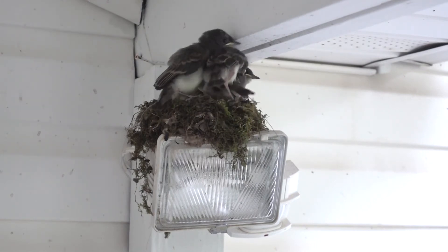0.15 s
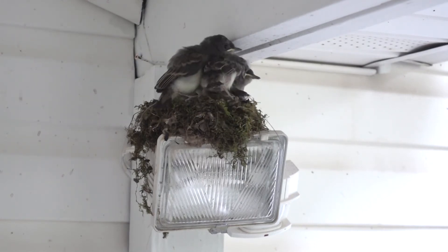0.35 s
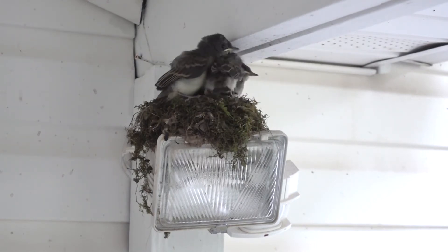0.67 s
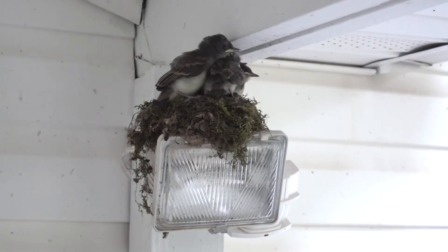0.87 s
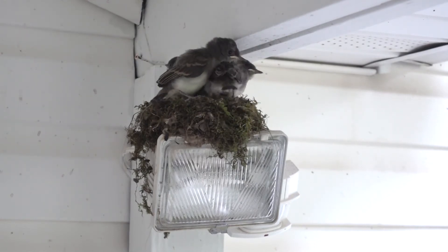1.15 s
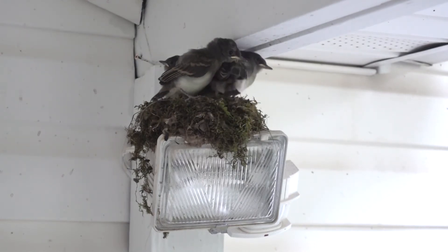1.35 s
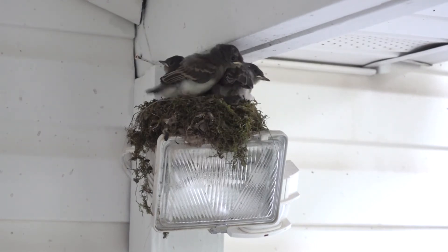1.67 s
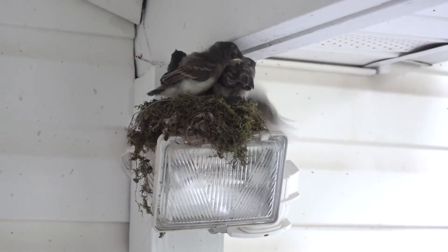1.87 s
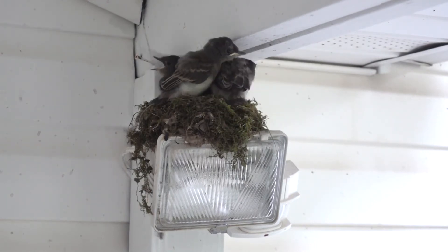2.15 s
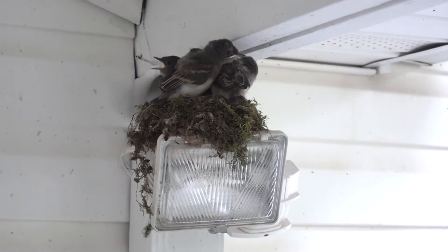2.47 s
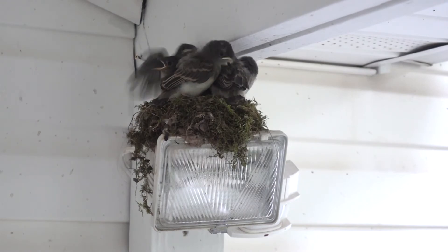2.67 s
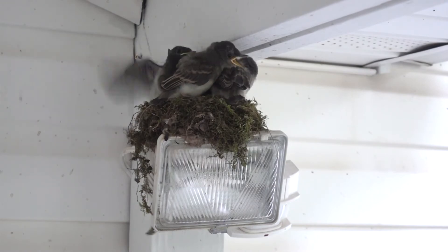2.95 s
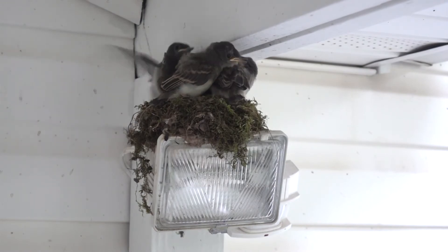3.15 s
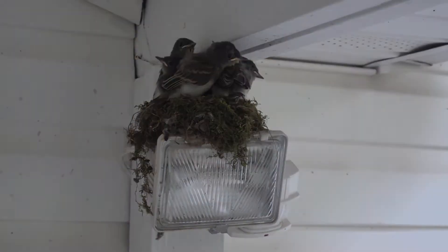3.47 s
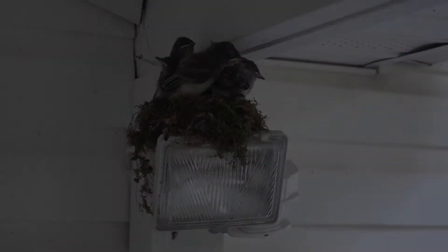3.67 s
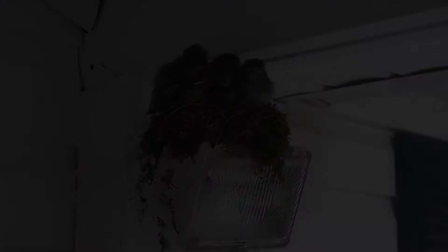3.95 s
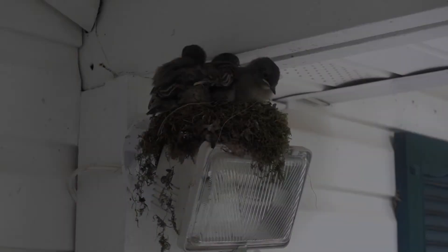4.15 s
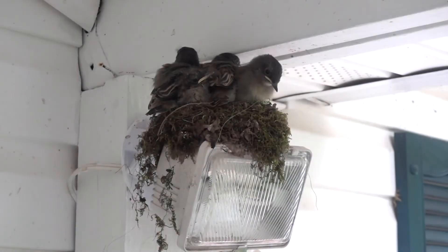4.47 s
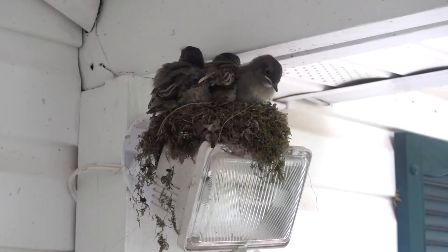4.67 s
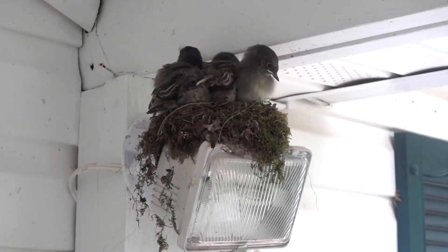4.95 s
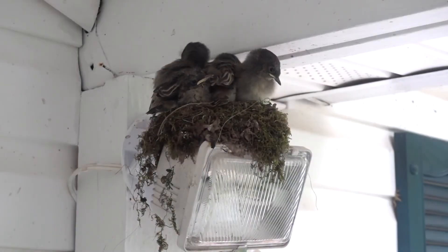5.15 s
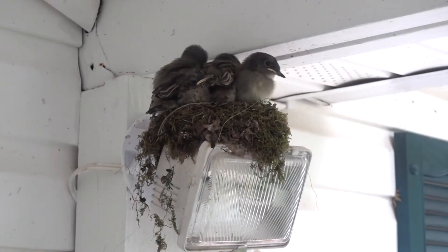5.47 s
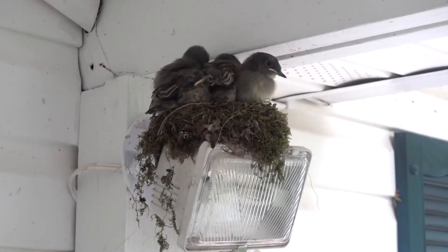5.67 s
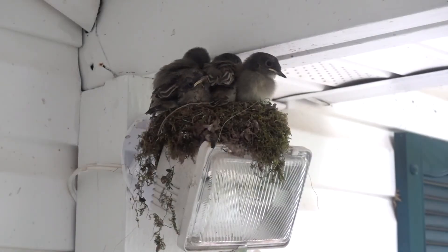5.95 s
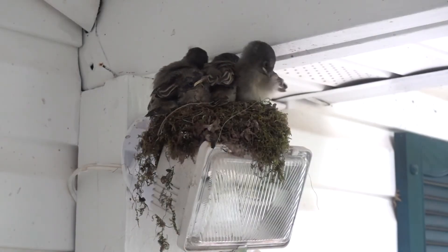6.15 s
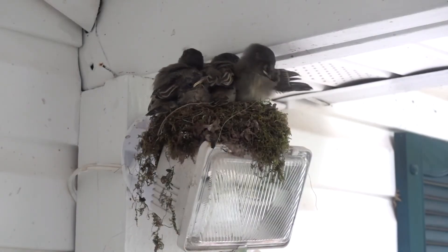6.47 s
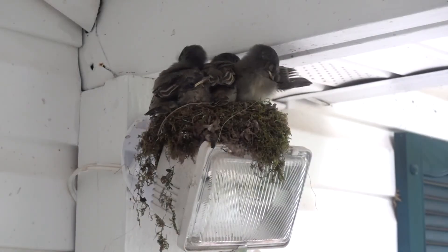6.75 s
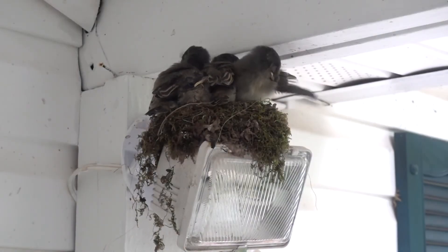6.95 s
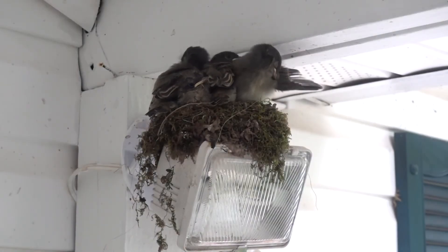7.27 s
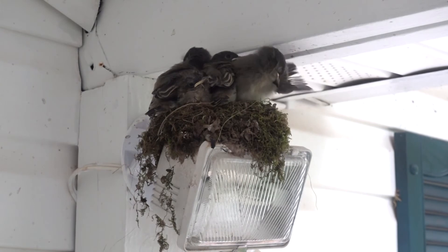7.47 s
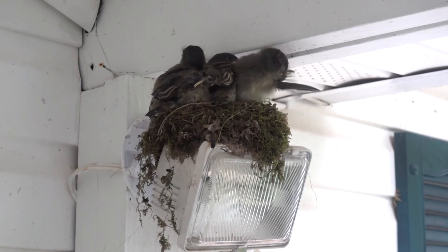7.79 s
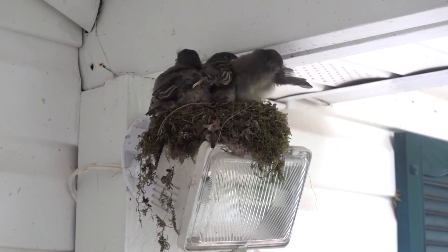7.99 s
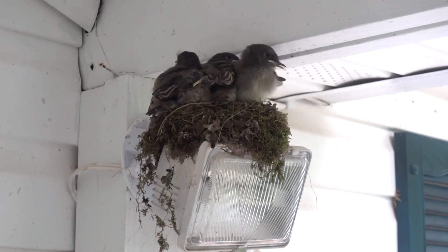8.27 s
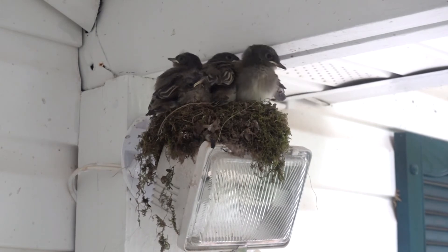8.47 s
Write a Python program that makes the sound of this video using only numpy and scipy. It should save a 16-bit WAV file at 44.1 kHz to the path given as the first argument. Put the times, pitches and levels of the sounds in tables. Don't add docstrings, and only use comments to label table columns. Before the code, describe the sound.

Outdoor porch, nearby stereo microphone, soft air hiss and faint machine hum. From 0 to 1.6 s a few chicks give thin, high whistles of about a tenth of a second, mostly sliding downward, at the start, 0.4, 0.9 and 1.4 s. At 1.9 s a loud steep cry begins a commotion: wing slaps and low air thumps around 2.0, 2.2-2.3 and 2.8 s, feathers rustling until about 3.1 s, with crowded piercing cries and grainy rasps through 3.7 s. At 3.9 s the background switches to darker air, deep rumble and a distant engine drone that slowly sinks and grows. Clear single peeps follow at 4.3, 4.8 and 5.7 s, fainter ones between and at 6.2, 6.9 and 7.5 s, then wavering calls around 8 s and short ones to 8.55 s. A tiny far insect buzz comes and goes. Calls have a short porch echo.

```python
import sys
import numpy as np
from scipy import signal
from scipy.fft import rfft, irfft, next_fast_len
from scipy.io import wavfile
from scipy.ndimage import uniform_filter1d, map_coordinates

SR = 44100
rng = np.random.default_rng(int(sys.argv[2]) if len(sys.argv) > 2 else 0)


def elevation(decibels):
    levels = np.asarray(decibels, float)
    return 10 ** (levels / 20)


def unload_wav(signal):
    wavfile.write(
        sys.argv[1],
        SR,
        np.round(np.clip(np.atleast_2d(signal).T, -1, 1) * 32767).astype(np.int16),
    )


N = 380141
TIME_S = np.arange(N) / SR
SCENE_CHANGE_S = 3.913

# hz, density_db_per_hz
AIR_BEFORE = [(30, -28.5), (50, -1), (92, -5.5), (170, -2), (400, -7), (480, -10), (700, -13),
              (1000, -19.5), (1450, -20.5), (1700, -22.5), (1950, -14.5), (3040, -21.5), (7000, -24.5),
              (15800, -28)]
# hz, density_db_per_hz
AIR_AFTER = [(100, -14.5), (160, -20.5), (225, -12.5), (300, -20), (480, -23.5), (800, -29), (1400, -30),
             (1620, -33.5), (1900, -26.5), (2800, -29), (4000, -34), (7000, -36), (11000, -40),
             (15800, -40.5)]
# hz, density_db_per_hz
RUMBLE = [(20, -25.0), (50, -4), (100, -2.5), (130, -9.0), (170, -64)]
AIR_BEFORE_DB, AIR_AFTER_DB, RUMBLE_DB = -50.5, -50, -83
# hz, correlation
LIKENESS = [(60, 1), (150, 0.98), (290, 0.89), (640, 0.2), (1410, 0.2), (3100, 0)]

# time_s, firing_hz, level_db
DRONE = [
    (3.911, 124.9, -42),
    (4.3, 122.8, -40.5),
    (5.4, 120.9, -38.5),
    (5.8, 121.4, -37),
    (7.5, 117, -35.5),
    (8.3, 115, -34.5),
    (8.62, 113.2, -34.5),
]
# hz, before_db, after_db, width_hz
HUM = [
    (27, -57.5, -57, 1.3),
    (63.2, -82, -57, 0.55),
    (101, -69.5, -54, 5.2),
    (126.5, -60, -60, 5),
    (235.3, -60.5, -63, 6.2),
    (411.5, -67, -69.5, 10),
]
# start_s, length_s, level_db
INSECT = [
    (4.59, 0.19, -59),
    (5.005, 0.13, -62),
    (6.41, 0.13, -61.5),
    (8.129, 0.24, -62.5),
    (8.403, .18, -59),
]

# hz, t60_s
PORCH_DECAY = [(300, .2), (5000, .235), (8500, .17), (11500, .2)]
STIR_DEPTH, STIR_HZ = .42, 500

# time_s, peak_db, thump_over_slap_db
FLAPS = [(1.789, -50, 8.5), (1.932, -43.5, 7.5), (1.979, -27, 0), (1.99, -32, 3), (2.034, -35.5, -1.5),
         (2.178, -38, -10), (2.193, -30, -3), (2.274, -33, -17), (2.305, -33.5, -12.5), (2.321, -32, -13),
         (2.331, -29, -8), (2.751, -33, -12.5), (2.778, -27, -7), (2.807, -33, -1.5), (2.862, -47.5, -16),
         (2.91, -42, -11)]
# peak_s, level_db
RUSTLE = [
    (2.002, -48),
    (2.2, -51),
    (2.329, -47.5),
    (2.62, -53),
    (2.79, -50),
    (2.93, -47.5),
    (3.05, -52),
]
# hz, density_db_per_hz
FEATHER = [(150, -11.5), (400, -3.5), (1500, -2), (2400, 0.5), (5000, -3.5), (12000, -6), (16000, -14)]
BRUSH_RISE_DB_PER_S, BRUSH_FALL_DB_PER_S = 92, 84
PUSH_HZ = 90, 380

# start_s, length_s, centre_hz, level_db, scatter_share
RASPS = [(.872, .022, 5600, -42, .08), (.914, .012, 5500, -38, .08), (1.978, .065, 4750, -33, .19),
         (2.244, .012, 4900, -35, .15), (2.261, .011, 5000, -31, .2), (2.272, .07, 4500, -41, .14),
         (2.422, .008, 5500, -36, .08), (2.879, .01, 5600, -38, .08), (3.414, .014, 4950, -34, .09),
         (2.592, .07, 4950, -31, .17), (2.898, .012, 4600, -31, .085), (2.952, .062, 5400, -29.5, .16),
         (3.07, .018, 5600, -33, .085), (3.096, .28, 4450, -48, .16), (3.29, .17, 4590, -46.5, .11),
         (3.656, .014, 5700, -31, .22), (3.645, .07, 5400, -38, .13), (3.684, .014, 6300, -38, .2),
         (7.94, .07, 4900, -47, .1)]
# start_s, length_s, centre_hz, level_db, scatter_share
WHEEZES = [
    (2.596, .06, 2900, -49, .14),
    (2.73, .085, 2400, -48, .17),
    (3.01, .07, 3000, -51, .12),
    (3.662, .045, 3650, -44, .08),
    (4.356, .035, 2800, -54, .1),
    (6.288, .05, 3350, -52, .13),
    (7.966, .08, 3200, -49, .24),
]
# hz, gain_db
BEAK = [(2000, -30), (3200, -20), (3800, -2), (4300, 0), (9500, 3.5), (12500, -5), (16000, -17)]
# hz, gain_db
CHEST = [(1200, -20), (2000, 0), (4200, 0), (5500, -15), (16000, -30)]
RASP_OCTAVE_DB, RASP_FULL_DB, RASP_THINS_DB_PER_DB = -2.5, -30.5, 3.4

# time_s, pitch_hz, level_db
CRIES = [
    [(1.889, 6900, -44), (1.897, 6560, -28), (1.917, 6550, -17), (1.926, 6400, -14), (1.945, 5780, -22),
     (1.959, 5190, -23), (1.968, 4590, -30), (1.983, 4350, -28)],
    [(2.187, 5090, -28), (2.205, 5415, -27.5), (2.225, 5570, -21), (2.236, 5440, -20), (2.243, 4950, -19),
     (2.251, 4550, -26), (2.254, 3950, -29), (2.266, 3850, -33)],
    [(2.259, 5900, -36), (2.266, 5330, -30), (2.291, 5330, -27.5), (2.312, 5150, -24), (2.318, 4930, -22),
     (2.37, 5057, -23.5), (2.415, 4850, -33), (2.428, 5077, -36.5)],
    [(2.527, 5450, -23), (2.541, 6010, -19), (2.55, 5560, -20), (2.562, 5480, -17), (2.572, 5100, -13),
     (2.592, 4820, -25)],
    [(2.879, 5400, -42), (2.89, 5130, -26), (2.9, 4950, -20), (2.903, 4500, -34)],
    [(2.903, 4500, -30), (2.909, 4720, -18), (2.915, 5020, -15), (2.921, 5160, -15), (2.929, 5070, -13),
     (2.938, 4800, -16), (2.948, 4620, -22), (2.952, 4550, -30)],
    [(3.001, 4800, -24), (3.009, 4740, -21), (3.028, 4750, -19), (3.04, 4770, -26), (3.06, 4760, -24),
     (3.073, 5000, -30)],
    [(3.541, 5226, -33), (3.56, 5820, -21), (3.585, 6110, -18.5), (3.615, 5947, -18.5), (3.63, 5800, -17),
     (3.639, 5100, -19), (3.643, 5250, -21), (3.652, 5250, -25)],
    [(2.951, 4250, -27), (2.958, 4030, -29), (2.972, 4030, -42)],
    [(2.594, 4220, -24), (2.605, 4130, -27), (2.612, 4270, -31), (2.625, 4220, -31), (2.64, 4300, -38)],
]
# time_s, pitch_hz, level_db
PLUNGES = [
    [(3.18, 6300, -30), (3.19, 6480, -23), (3.197, 6200, -18), (3.218, 5710, -15), (3.235, 5400, -19),
     (3.253, 4910, -15), (3.262, 4600, -24), (3.288, 3970, -32)],
]
# time_s, pitch_hz, level_db
WARBLES = [
    [(.018, 7100, -52), (.03, 6750, -36), (.045, 6600, -26), (.074, 5830, -26), (.085, 5540, -29),
     (.11, 5420, -27.5), (.129, 5220, -28.5), (.142, 5000, -37)],
    [(.1, 5850, -40), (.122, 5840, -35), (.14, 5850, -34), (.157, 5700, -33), (.171, 5480, -35),
     (.187, 5080, -37)],
    [(.859, 6350, -50), (.868, 5900, -39), (.884, 5930, -33), (.898, 5870, -25), (.912, 5710, -29),
     (.919, 5510, -35), (.927, 5370, -31), (.941, 5150, -38)],
    [(.918, 6100, -30), (.94, 6090, -25), (.955, 5950, -27), (.975, 5680, -22), (1.0, 5320, -24),
     (1.028, 5200, -30)],
    [(1.391, 6400, -38), (1.41, 6320, -31), (1.422, 6230, -23), (1.436, 6140, -24), (1.455, 5800, -25),
     (1.48, 5580, -21), (1.504, 5300, -24), (1.515, 5200, -33), (1.545, 5230, -40)],
    [(2.657, 6150, -40), (2.668, 5930, -35), (2.681, 6030, -31), (2.695, 5830, -30.5), (2.716, 5540, -30),
     (2.733, 5080, -39)],
    [(6.218, 6750, -42), (6.228, 6630, -37), (6.256, 5960, -35), (6.27, 5480, -30), (6.28, 4990, -37),
     (6.296, 4930, -42), (6.306, 4900, -37), (6.328, 4850, -48)],
    [(7.927, 5700, -44), (7.937, 5550, -39), (7.948, 5780, -35), (7.957, 5650, -33), (7.967, 5280, -36)],
    [(7.964, 5850, -33), (7.974, 5440, -33), (7.982, 5950, -43), (7.989, 6060, -42), (8.002, 5550, -35),
     (8.01, 5050, -44), (8.045, 4880, -48)],
    [(8.351, 6700, -38), (8.362, 6400, -35), (8.378, 6270, -33), (8.398, 5600, -23), (8.408, 5320, -26),
     (8.438, 5190, -35), (8.47, 4850, -41)],
]
# time_s, pitch_hz, level_db
STRANDS = [
    [(1.99, 5550, -36), (2.001, 5110, -33), (2.012, 4870, -36), (2.024, 4780, -46)],
    [(1.992, 6250, -39), (2.007, 6060, -33), (2.016, 5850, -35), (2.025, 5680, -43)],
    [(2.038, 5500, -46), (2.05, 5450, -44), (2.064, 5330, -44), (2.069, 5000, -49), (2.082, 4740, -48)],
]
# time_s, pitch_hz, level_db
REEDY = [
    [(6.236, 6750, -48), (6.252, 6550, -41), (6.268, 6250, -44), (6.28, 5800, -40), (6.297, 5250, -33),
     (6.31, 4950, -39)],
    [(4.862, 5800, -50), (4.875, 6150, -46), (4.887, 6260, -44), (4.9, 6140, -43), (4.916, 5780, -40),
     (4.933, 5250, -37)],
    [(3.911, 6150, -33), (3.935, 5580, -33.5), (3.955, 5140, -33), (3.972, 4830, -41), (3.995, 4660, -51)],
    [(7.446, 5250, -45), (7.465, 6300, -46), (7.485, 6180, -49.5), (7.5, 5800, -51), (7.506, 5700, -38),
     (7.522, 5040, -35.5), (7.545, 5230, -44), (7.556, 4770, -46)],
]
# time_s, pitch_hz, level_db
PURE = [
    [(2.33, 4150, -58), (2.4, 4200, -50), (2.44, 4190, -51), (2.465, 4200, -59), (2.49, 4240, -52),
     (2.6, 4210, -55)],
    [(8.018, 4580, -44), (8.044, 4410, -37), (8.06, 4260, -40), (8.08, 4520, -44), (8.105, 4280, -43),
     (8.128, 4080, -48)],
    [(8.487, 5300, -38), (8.498, 5350, -32), (8.516, 4850, -38)],
    [(8.521, 4550, -43), (8.53, 4100, -43), (8.54, 3950, -49)],
]
# time_s, pitch_hz, level_db
STUTTERS = [
    [(2.96, 4900, -24), (2.968, 5000, -18), (2.978, 5060, -20), (2.988, 4980, -18), (3.0, 4850, -20),
     (3.006, 4800, -20)],
]

# start_s, length_s, top_hz, end_hz, level_db
SLIDES = [
    (.115, .045, 6300, 6150, -38),
]
# start_s, length_s, top_hz, end_hz, level_db
PEEPS = [
    (4.288, .085, 6730, 5300, -25),
    (4.796, .092, 6810, 5296, -24.5),
    (5.67, .082, 6610, 5160, -28.5),
]
# start_s, length_s, top_hz, end_hz, level_db
ARCHES = [
    (1.912, 0.018, 5420, 5400, -30),
    (2.912, 0.055, 5950, 5750, -27),
    (6.236, 0.041, 5550, 5220, -40),
    (6.872, 0.096, 6360, 4976, -39.5),
]
# start_s, length_s, top_hz, end_hz, level_db
SWOOPS = [
    (.422, .13, 6660, 4990, -26.5),
]
# start_s, length_s, top_hz, end_hz, level_db
DROPS = [
    (5.215, .068, 6330, 4570, -40),
    (8.354, .026, 5750, 5420, -41),
]
# start_s, length_s, first_hz, end_hz, level_db
HOLDS = [(2.268, .06, 3880, 3950, -40), (1.65, .15, 4580, 4580, -66.5), (2.645, .026, 4620, 4300, -33),
         (2.678, .024, 4500, 4450, -41), (3.369, 0.014, 5315, 5460, -26), (3.414, .012, 4950, 4850, -27),
         (3.647, 0.067, 5350, 5180, -25), (4.36, .04, 5100, 4820, -41.5), (4.888, .028, 5150, 4920, -42),
         (6.322, .022, 4650, 4580, -48), (7.973, 0.03, 4320, 4450, -38), (5.285, 0.0607, 4460, 4380, -58.5),
         (3.18, .013, 7010, 7000, -29), (2.608, .036, 5020, 5300, -27), (.87, .018, 6550, 6250, -37),
         (1.958, .014, 5200, 5000, -24), (1.984, .008, 3960, 3940, -34), (7.936, .035, 6500, 6050, -42)]
# start_s, length_s, first_hz, end_hz, level_db
CROAKS = [
    (2.685, .045, 3020, 2930, -48),
    (2.725, .032, 2500, 2050, -48),
    (2.776, .02, 2300, 2250, -48),
    (6.302, .034, 3250, 3300, -55),
    (7.968, .03, 3300, 3400, -52),
]

SLIDE_SHAPE = dict(scoop=0.0197, top_at=.2, end_at=0.96, bend=1.3, attack_s=0.0195,
                   onset_db=-14, early_db=-1, loud_at=.75, fade_db=-6)
PEEP_SHAPE = dict(scoop=.002, top_at=0.054, end_at=.62, bend=1.2, attack_s=0.017,
                  onset_db=-1, early_db=-5.5, loud_at=0.52, fade_db=-18.5)
ARCH_SHAPE = dict(scoop=.05, top_at=0.22, end_at=.85, bend=1.3, attack_s=0.028,
                  onset_db=-10, early_db=-4.5, loud_at=0.61, fade_db=-3)
HOLD_SHAPE = dict(scoop=.002, top_at=.05, end_at=.9, bend=0.76, attack_s=.004,
                  onset_db=4, early_db=-5.5, loud_at=.12, fade_db=-8.5)
SWOOP_SHAPE = dict(scoop=0.016, top_at=0.17, end_at=.82, bend=.8, attack_s=0.033,
                   onset_db=-13, early_db=-0.5, loud_at=0.86, fade_db=-11)
DROP_SHAPE = dict(scoop=.012, top_at=.25, end_at=.95, bend=1.4, attack_s=.007,
                  onset_db=-12, early_db=-1.5, loud_at=.3, fade_db=-14)

TIMBRE = dict(
    pure=dict(octave_db=-42, tilt_db=.1, pan_db=-.3, scatter=.004),
    reedy=dict(octave_db=-18.5, tilt_db=16, pan_db=2, scatter=0.0033),
    plunge=dict(octave_db=-26.5, tilt_db=-19.5, pan_db=.2, scatter=.003),
    cry=dict(octave_db=-19.5, tilt_db=-10, pan_db=.2, scatter=.004),
    stutter=dict(octave_db=-24, tilt_db=0, pan_db=.2, scatter=.012, chop=.8),
    warble=dict(octave_db=-29, tilt_db=2.5, pan_db=0.4, scatter=0.0028),
    slide=dict(octave_db=-19, tilt_db=0, pan_db=0, scatter=0.0087),
    swoop=dict(octave_db=-29.5, tilt_db=7.5, pan_db=0.5, scatter=0.0017),
    drop=dict(octave_db=-27, tilt_db=6, pan_db=1.2, scatter=.006),
    peep=dict(octave_db=-23, tilt_db=-6, pan_db=.8, scatter=.003),
    arch=dict(octave_db=-27.5, tilt_db=1, pan_db=1.1, scatter=0.00305),
    hold=dict(octave_db=-28, tilt_db=-0.5, pan_db=.1, scatter=.017),
    croak=dict(octave_db=-28.5, tilt_db=-1, pan_db=1.5, scatter=0.045))
CHOP_HZ = 128
OCTAVE_PER_EFFORT = .15
FACING_DB = 3.5
THROAT_HZ, THROAT_WIDTH_HZ, THROAT_DB = 8600, 1000, 6
THIRD_HZ, THIRD_WIDTH_HZ, THIRD_DB = 14000, 1400, -14
STRAIN_HZ_PER_S = 20000

CEILING, KNEE = .72, 4
TOP_HZ = 15850


def unit(x):
    return x / np.sqrt(np.mean(x ** 2) + 1e-20)


def along(points, hz):
    f, v = np.transpose(points)
    return np.interp(np.log(hz + 1), np.log(f + 1), v)


def wobble(rate_hz, count=N):
    knots = rng.standard_normal(int(count * rate_hz / SR) + 4)
    return map_coordinates(knots, [np.arange(count) * rate_hz / SR])


def filtered(x, response):
    m = next_fast_len(N + 8192)
    return irfft(rfft(x, m) * response(np.fft.rfftfreq(m, 1 / SR)), m)[..., :N]


def rush(spectrum):
    def mid_side_gain(hz):
        turn = np.arccos(np.clip(along(LIKENESS, hz), -1, 1)) / 2
        return elevation(along(spectrum, hz)) * [np.cos(turn), np.sin(turn)]

    mid, side = filtered(rng.standard_normal((2, N)), mid_side_gain)
    return unit(np.array([mid + side, mid - side]))


def add(out, start_s, x, pan_db=0):
    part = out[:, round(start_s * SR):][:, :x.shape[-1]]
    part += x[..., :part.shape[1]] * elevation([[pan_db / 2], [-pan_db / 2]])


def air():
    before = elevation(AIR_BEFORE_DB) * rush(AIR_BEFORE)
    after = elevation(AIR_AFTER_DB) * rush(AIR_AFTER)
    low = elevation(RUMBLE_DB) * rush(RUMBLE)
    return np.where(TIME_S < SCENE_CHANGE_S, before, after + low) * elevation(.6 * wobble(2.5))


def drone():
    s, hz, db = np.transpose(DRONE)
    phase = 2 * np.pi * np.cumsum(np.interp(TIME_S, s, hz) + 0.7 * wobble(6)) / SR
    octave = elevation(-27.5 + 1.85 * wobble(1.6)) * np.sin(2 * phase)
    tone = np.sqrt(2) * (np.sin(phase) + octave)
    out = elevation(np.interp(TIME_S, s, db, -120) + 0.51 * wobble(4.1)) * tone
    for hz, before_db, after_db, width_hz in HUM:
        line = np.sin(2 * np.pi * np.cumsum(hz + width_hz * wobble(10)) / SR)
        level_db = np.where(TIME_S < SCENE_CHANGE_S, before_db, after_db) + 1.2 * wobble(5)
        out += np.sqrt(2) * elevation(level_db) * line
    return out


def insect():
    swell = sum(elevation(db) * np.sin(np.pi * np.clip((TIME_S - s) / length, 0, 1)) for s, length, db in INSECT)
    buzz = filtered(rng.standard_normal((2, N)), lambda hz: np.exp(-((hz - 8000) / 320) ** 2))
    return swell * unit(buzz) * elevation(2.8 * wobble(70))


def porch(x):
    out, step = np.zeros((2, N + SR)), SR // 20

    def reflected(hz):
        return (hz > 300) * elevation(np.clip((hz - 5300) / 200, -4, 5) + 5 * (hz > 10200))

    x = filtered(x, reflected)
    x = np.pad(x * unit(1 + STIR_DEPTH * wobble(STIR_HZ)), (step, 0))
    for k in range(0, N + step, step):
        hz, t, z = signal.stft(rng.standard_normal((2, SR // 3)), SR, nperseg=256)
        fall = elevation(-60 * t / along(PORCH_DECAY, hz)[:, None])
        tail = signal.istft(z * fall, SR, nperseg=256)[1]
        piece = x[k:k + 2 * step]
        piece = piece * signal.windows.hann(2 * step, sym=False)[:len(piece)]
        wet = signal.fftconvolve(piece[None], tail / np.linalg.norm(tail[0]), axes=1)
        out[:, k + 90:k + 90 + wet.shape[1]] += wet
    return out[:, step:N + step]


def wings():
    out, t = np.zeros((2, N)), np.arange(SR // 20) / SR
    for s, db, thump_db in FLAPS:
        shared = .7 * rng.standard_normal(len(t))
        burst = shared + .6 * rng.standard_normal((2, len(t)))
        slap = signal.lfilter([.27], [1, -.78], burst) * elevation(-60 * t / 0.036)
        band = signal.butter(2, PUSH_HZ, "band", fs=SR)
        push = unit(signal.lfilter(*band, rng.standard_normal(len(t))))
        thump = .8 * elevation(thump_db - 60 * t / 0.061) * push
        add(out, s, elevation(db) * (1.14 * slap + thump))
    bouts_db = [db + np.minimum(BRUSH_RISE_DB_PER_S * (TIME_S - s), BRUSH_FALL_DB_PER_S * (s - TIME_S))
                for s, db in RUSTLE]
    level_db = np.max(bouts_db, 0) + 1.5 + 3 * wobble(60)
    return out + elevation(level_db) * rush(FEATHER)


def syrinx(hz, octave_db):
    phase = 2 * np.pi * np.cumsum(hz) / SR + rng.uniform(0, 6.1)
    fall_hz_per_s = -SR * uniform_filter1d(np.gradient(hz), size=400)
    strain = np.clip(fall_hz_per_s / STRAIN_HZ_PER_S, .12, 1)
    third_gain = np.exp(-((3 * hz - THIRD_HZ) / THIRD_WIDTH_HZ) ** 2)
    third = strain * elevation(octave_db + THIRD_DB) * third_gain
    octave_db = octave_db + THROAT_DB * np.exp(-((2 * hz - THROAT_HZ) / THROAT_WIDTH_HZ) ** 2)
    return np.sqrt(2) * (np.sin(phase) + elevation(octave_db) * np.sin(2 * phase) + third * np.sin(3 * phase))


def rasps(rows, colour):
    out = np.zeros((2, N))
    for s, length, hz, db, share in rows:
        octave_db = RASP_OCTAVE_DB + RASP_THINS_DB_PER_DB * min(db - RASP_FULL_DB, 0)
        t = np.arange(int(length * SR)) / SR
        pitch_hz = hz * (1 + share * (0.7 * wobble(200, len(t)) + wobble(4000, len(t))))
        edges = np.clip(np.minimum(t, (length - t) / 3) / .004, 0, 1)
        level = elevation(db - 8 * t / length + 2.5 * wobble(150, len(t))) * edges
        add(out, s, level * syrinx(pitch_hz, octave_db))
    return filtered(out, lambda hz: elevation(along(colour, hz)))


def shaped(rows, scoop, top_at, end_at, bend, attack_s, onset_db, early_db, loud_at, fade_db):
    u, paths = np.linspace(0, 1, num=41), []
    for s, length, top_hz, end_hz, db in rows:
        sink = np.clip((u - top_at) / (end_at - top_at), 0, 1) ** bend
        rise = 1 - scoop * np.clip(1 - u / top_at, 0, 1) ** 2
        hz = top_hz * rise - (top_hz - end_hz) * sink
        attack = min(attack_s / length, loud_at / 2)
        swell_db = np.interp(u, [0, attack, loud_at, 1], [onset_db, early_db, 0, fade_db])
        paths.append(np.transpose([s + u * length, hz, db + swell_db]))
    return paths


def whistle(note, octave_db, tilt_db, pan_db, scatter, chop=0):
    s, hz, db = np.transpose(note)
    t = s.min() + np.arange(int((np.ptp(s) + 0.002) * SR)) / SR
    count = len(t)
    share = scatter + .008 * np.linspace(0, 1, count) ** 4
    glide_hz = uniform_filter1d(np.interp(t, s, hz), size=120)
    pitch_hz = glide_hz * (1 + share * wobble(900, count) + 0.0025 * wobble(70, count))
    edges = np.clip(np.minimum((t - t[0]) / .006, (t[-1] - t) / .004), 0, 1)
    level = elevation(np.interp(t, s, db) + 2.0 + 1.3 * wobble(160, count)) * edges
    chop_phase = np.pi * np.cumsum(CHOP_HZ * (1 + .2 * wobble(60, count))) / SR
    level *= 1 - chop * np.cos(chop_phase) ** 2
    octave_db = octave_db + tilt_db * (glide_hz - 5500) / 1000
    octave_db += OCTAVE_PER_EFFORT * (db.max() + 20) + FACING_DB * (s[0] > SCENE_CHANGE_S - .01)
    return t[0], level * syrinx(pitch_hz, octave_db + 1.3 * wobble(84.4, count)), pan_db


def whistles():
    out = np.zeros((2, N))
    kinds = dict(cry=CRIES, stutter=STUTTERS, pure=PURE, reedy=REEDY, plunge=PLUNGES,
                 warble=WARBLES + STRANDS,
                 swoop=shaped(SWOOPS, **SWOOP_SHAPE), drop=shaped(DROPS, **DROP_SHAPE),
                 slide=shaped(SLIDES, **SLIDE_SHAPE), peep=shaped(PEEPS, **PEEP_SHAPE),
                 arch=shaped(ARCHES, **ARCH_SHAPE), hold=shaped(HOLDS, **HOLD_SHAPE),
                 croak=shaped(CROAKS, **HOLD_SHAPE))
    for kind, notes in kinds.items():
        for note in notes:
            add(out, *whistle(note, **TIMBRE[kind]))
    return out


def scene():
    chicks = whistles() + rasps(RASPS, BEAK) + rasps(WHEEZES, CHEST) + wings()
    wet = elevation(np.where(TIME_S < SCENE_CHANGE_S, -6, -5)) * porch(chicks.mean(0))
    return chicks + wet + drone() + insect() + air()


def masked(x, margin_db, slope_db_per_khz):
    hz, _, z = signal.stft(x, SR, nperseg=1024)
    bins = 12
    band = np.arange(len(hz)) // bins
    power = np.add.reduceat(np.mean(abs(z) ** 2, 0), np.arange(0, len(hz), bins), axis=0)
    level_db = 10 * np.log10(uniform_filter1d(power, size=4, axis=1, origin=1) + 1e-14)[band]
    fall_db = slope_db_per_khz * hz[band * bins, None] / 1000
    masker_db = np.where(hz[:, None] > 3000, level_db + fall_db, -200)
    mask_db = np.maximum.accumulate(masker_db, axis=0) - fall_db - margin_db
    keep = np.clip(level_db - mask_db, 0, 1) * (hz[:, None] < TOP_HZ)
    return signal.istft(z * keep, SR, nperseg=1024)[1][:, :N]


def top_cut(x):
    return signal.sosfilt(signal.butter(12, 15750, fs=SR, output="sos"), x)


def record(dry):
    rounded = dry / (1 + abs(dry / CEILING) ** KNEE) ** (1 / KNEE)
    mix = masked(rounded, margin_db=34, slope_db_per_khz=2.1)
    return top_cut(mix)


dry = scene()
out = record(dry)
unload_wav(out)
```